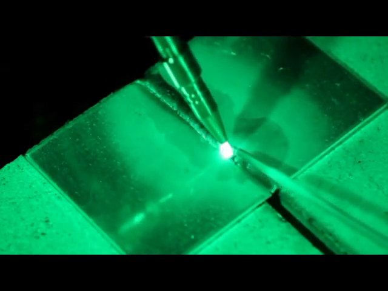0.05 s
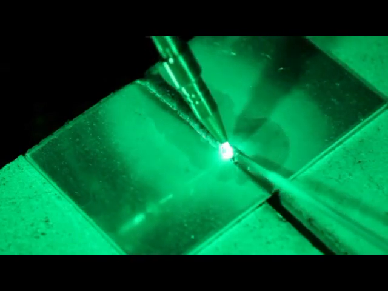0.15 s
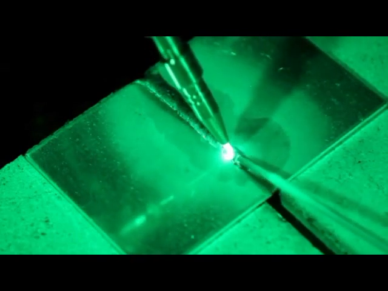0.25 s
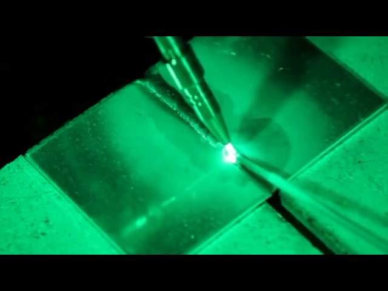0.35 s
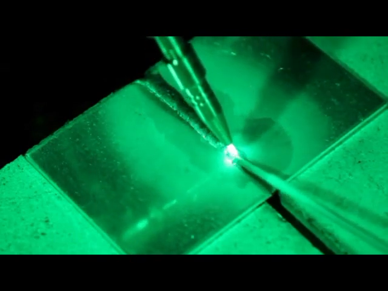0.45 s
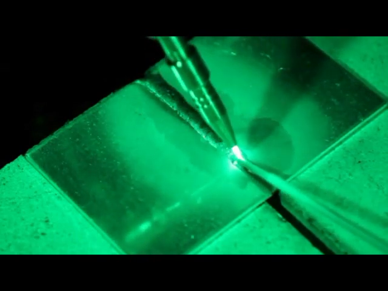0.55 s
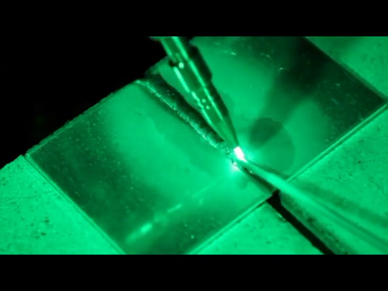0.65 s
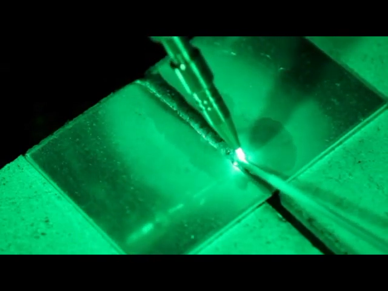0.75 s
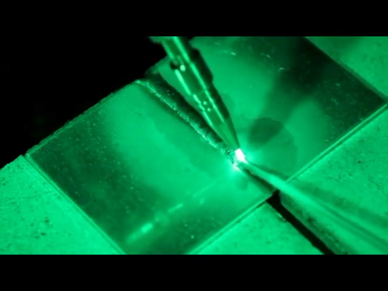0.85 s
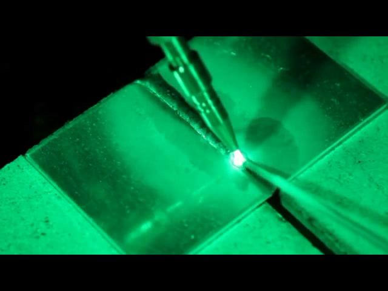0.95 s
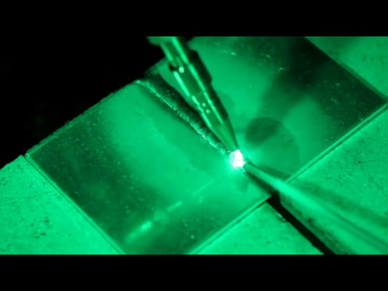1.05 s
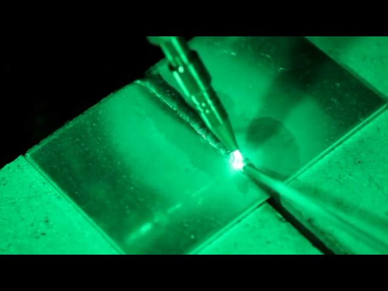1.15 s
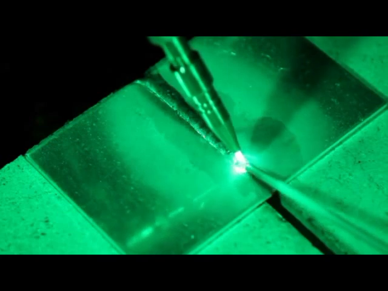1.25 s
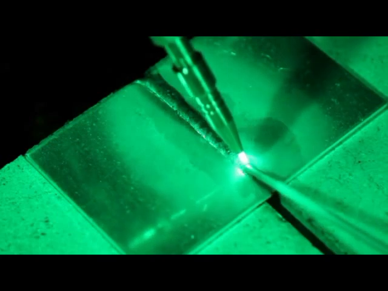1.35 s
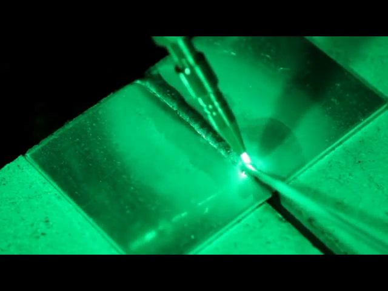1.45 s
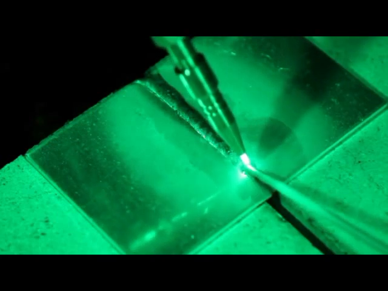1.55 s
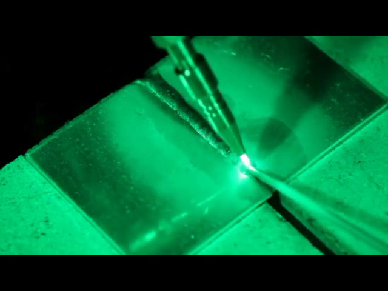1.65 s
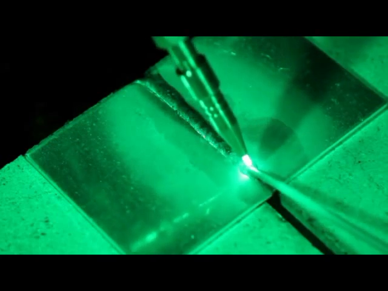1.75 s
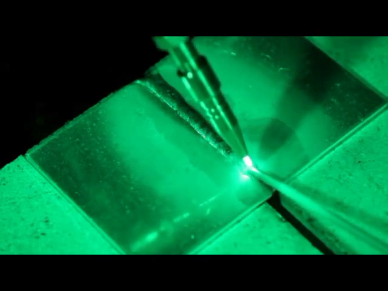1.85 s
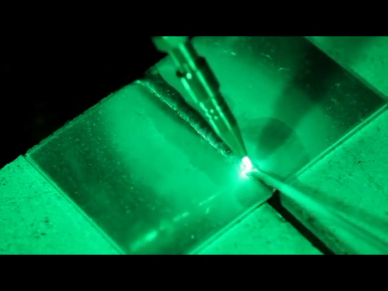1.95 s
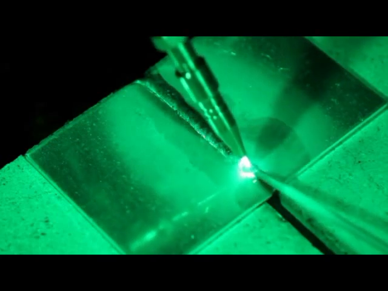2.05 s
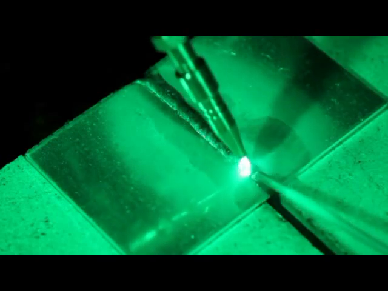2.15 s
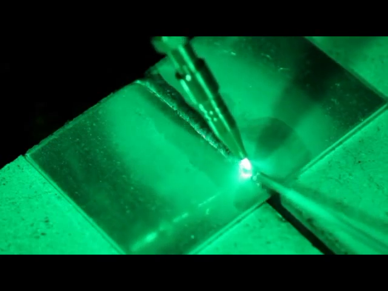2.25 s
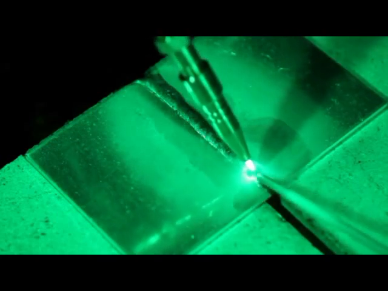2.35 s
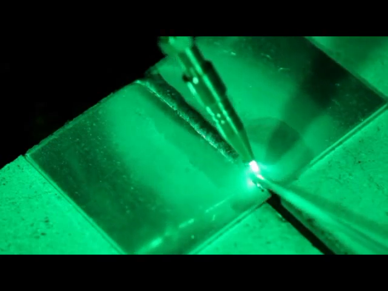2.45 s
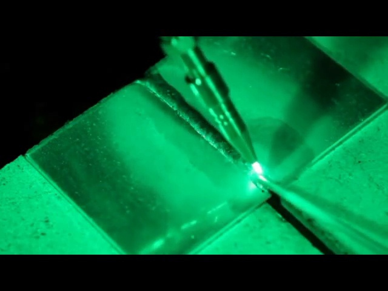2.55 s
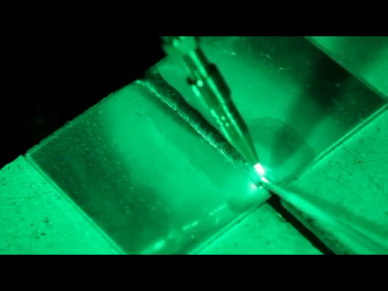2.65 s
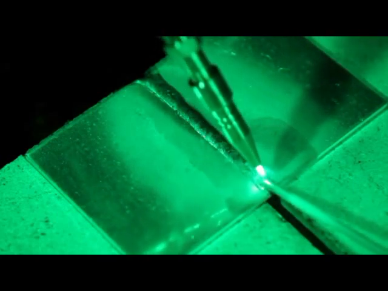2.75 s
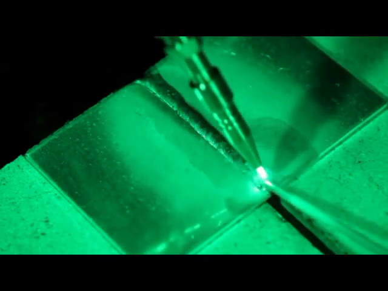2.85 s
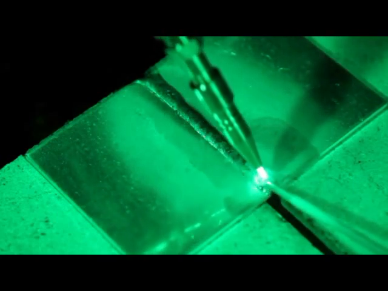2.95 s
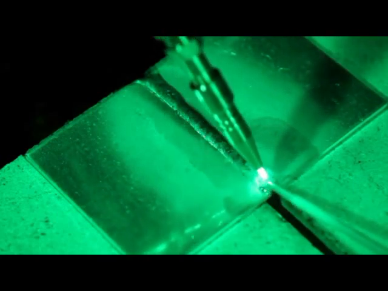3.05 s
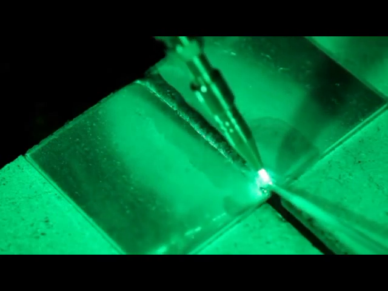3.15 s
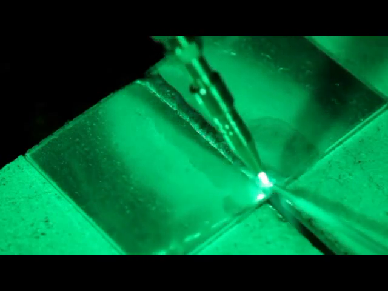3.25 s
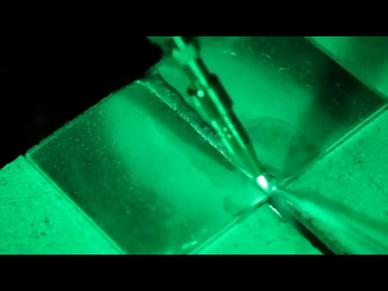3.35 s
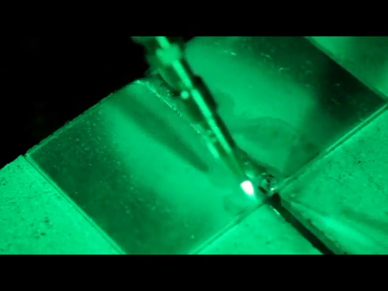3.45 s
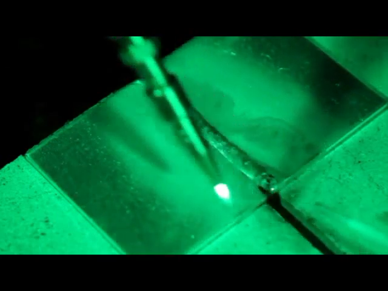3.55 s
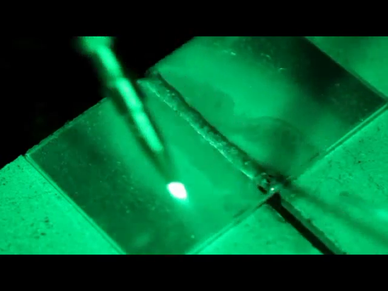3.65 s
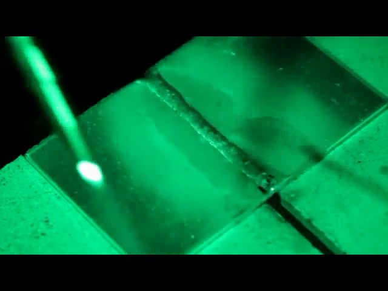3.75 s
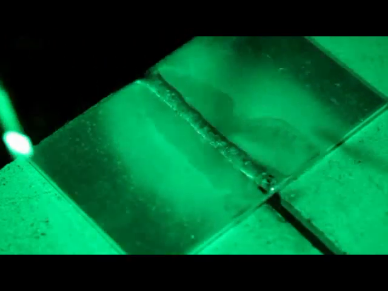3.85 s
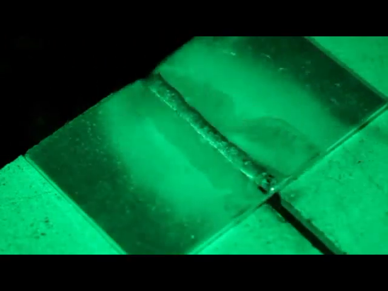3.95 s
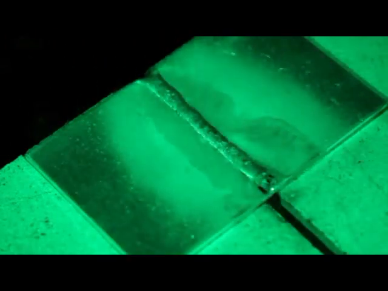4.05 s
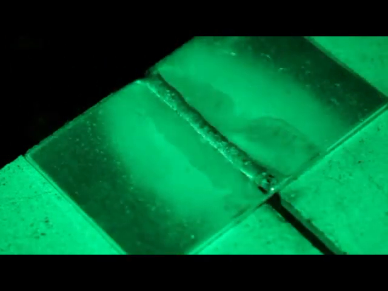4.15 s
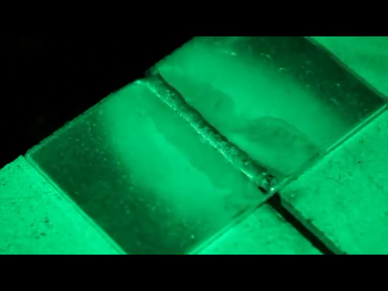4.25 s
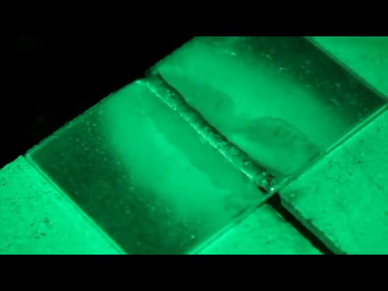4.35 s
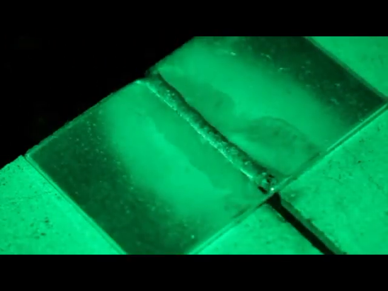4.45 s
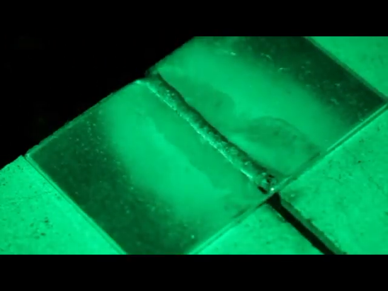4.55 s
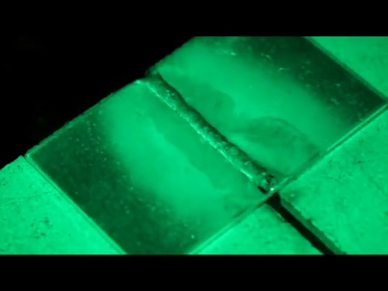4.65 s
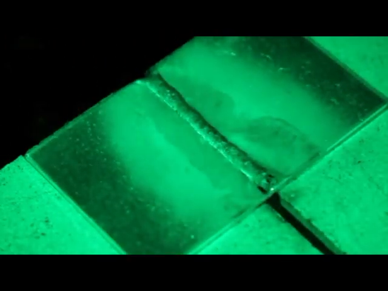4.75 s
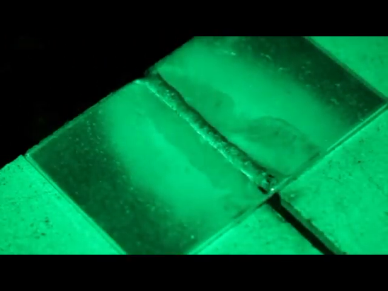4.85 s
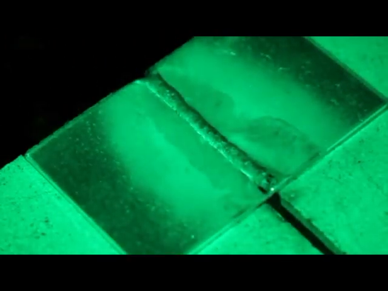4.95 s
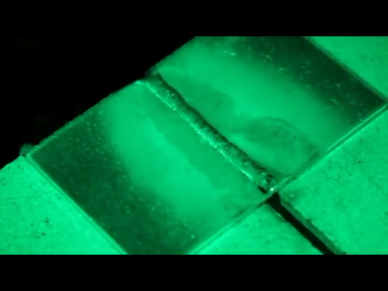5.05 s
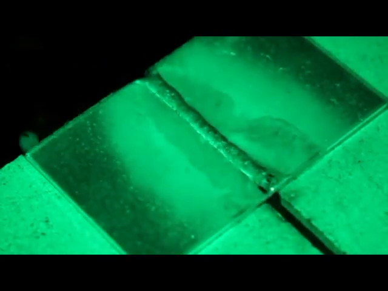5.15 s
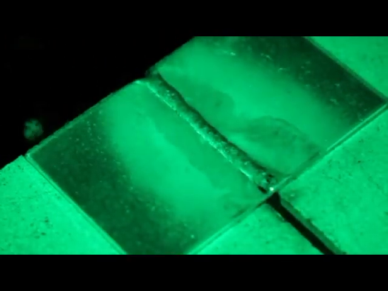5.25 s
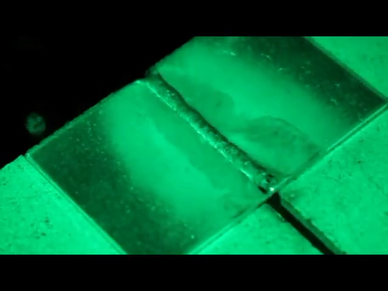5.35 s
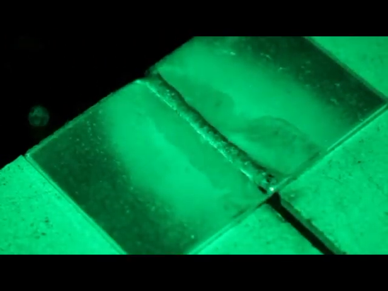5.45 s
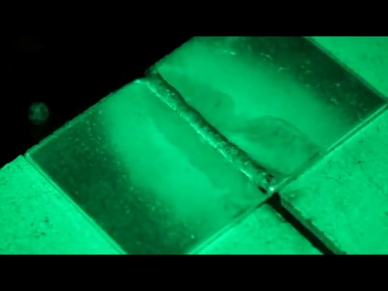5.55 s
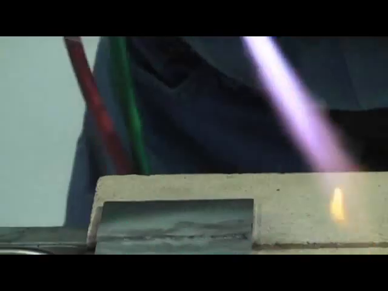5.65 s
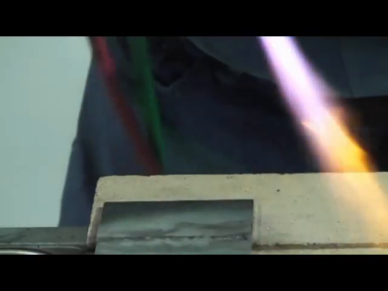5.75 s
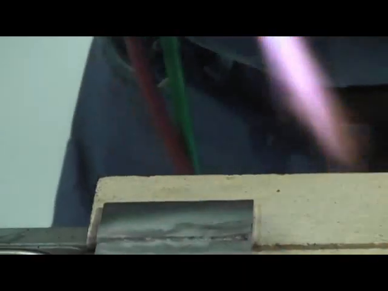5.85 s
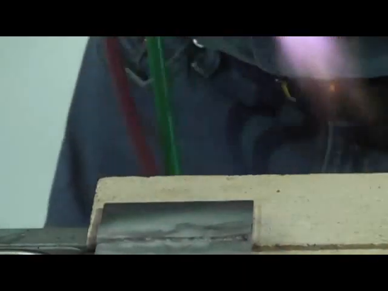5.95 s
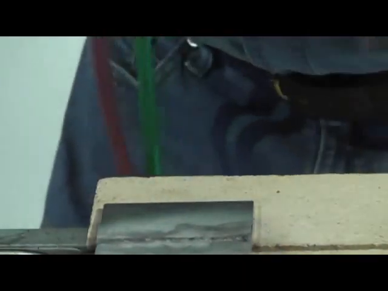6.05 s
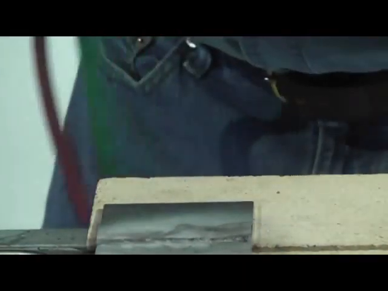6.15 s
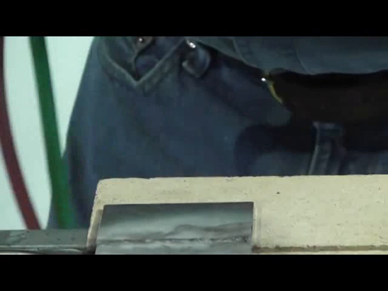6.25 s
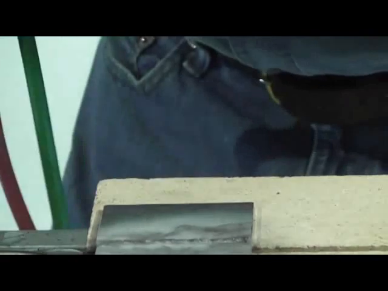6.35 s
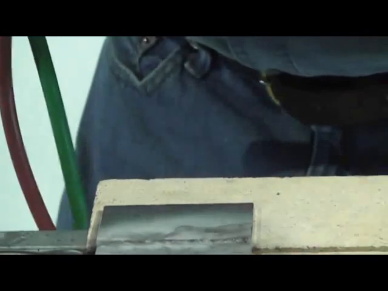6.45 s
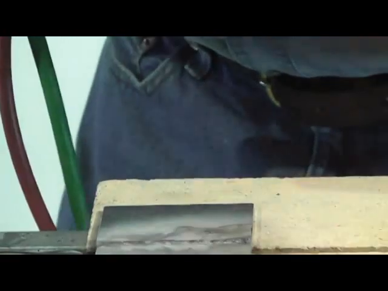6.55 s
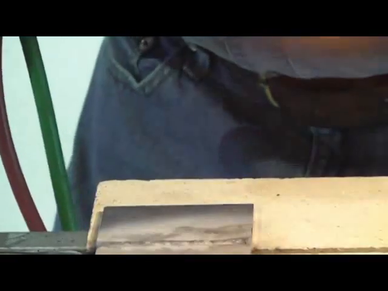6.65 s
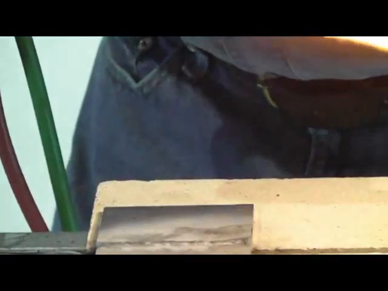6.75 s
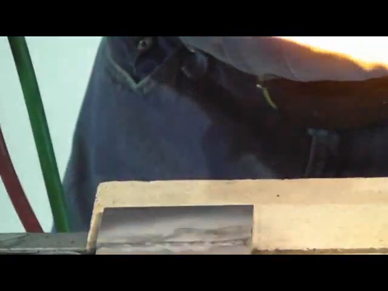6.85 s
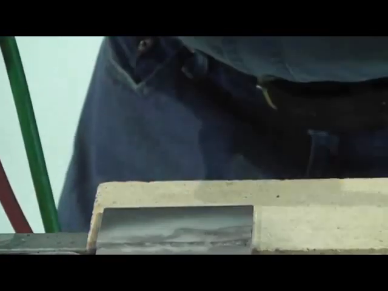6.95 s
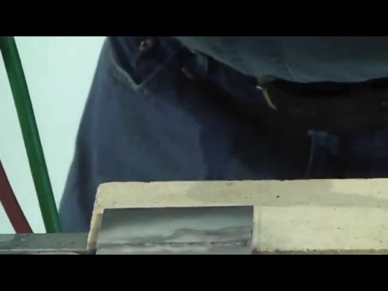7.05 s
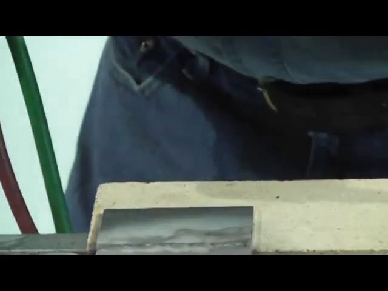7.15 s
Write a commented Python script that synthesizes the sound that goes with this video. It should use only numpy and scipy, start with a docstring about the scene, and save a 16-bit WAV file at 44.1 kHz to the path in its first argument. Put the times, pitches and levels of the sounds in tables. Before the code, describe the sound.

In a workshop, close up and the same in both channels, a gas torch burns with a low, faint roar and airy hiss. Sharp clicks of hot metal and tiny crackles come in irregular clusters, with a soft sinking burble midway. The flame then swells into a fluttering roar, small fittings clink lightly, and one very loud, distorted pop bursts out at the end, with a short room echo.

```python
"""A gas torch burns over a brick bench in a workshop, heard from close by, alike in both channels.
The flame is shaped noise: a roar combed by its echo off the bench, a rush of hot gas and the hiss of the jet.
It burbles once (a sinking tone in a puff of noise), then roars louder as the torch is lifted and swung.
Hot metal snaps and spatters in short clicks, and loose fittings ring as dying sines.
Near the end comes one overloading pop: a noise burst with the ring of the pipe, over the roar."""
import sys
import numpy as np
from scipy import signal
from scipy.fft import rfft, irfft
from scipy.io import wavfile
from scipy.ndimage import uniform_filter1d

SR = 44100
rng = np.random.default_rng(int(sys.argv[2]) if len(sys.argv) > 2 else 0)


def wrap_up_sound(samples):
    """Save the sound to the file named by the first command line argument, as 16-bit audio."""
    columns = np.atleast_2d(samples).T
    # keep every value between -1 and 1, then stretch to whole-number steps
    tamed = np.clip(columns, -1, 1)
    steps = np.round(tamed * 32767).astype(np.int16)
    wavfile.write(sys.argv[1], SR, steps)


N = 317255  # length in samples


def gain_of(db):
    """Turns decibels into a factor."""
    return 10 ** (np.asarray(db) / 20)


def evened(x):
    """Scales a sound to an rms of 1."""
    return x / np.sqrt(np.mean(x ** 2) + 1e-20)


def smooth_noise(count, size):
    """Slow random drift with an rms of 1, averaged over size values."""
    return evened(uniform_filter1d(rng.standard_normal(count), size=size))


def read(points, hz):
    """Reads a spectrum table on a log-frequency axis."""
    f, value = np.transpose(points)
    return np.interp(np.log(hz + 1), np.log(f + 1), value)


def along(table, t):
    """Reads the columns of a time curve at times t."""
    s, *columns = np.transpose(table)
    return [np.interp(t, s, column) for column in columns]


def add(mix, s, sound):
    """Mixes a sound in from time s."""
    part = mix[round(s * SR):][:len(sound)]
    part += sound[:len(part)]


def coloured(x, points):
    """Filters x by a spectrum table without delay."""
    hz = np.fft.rfftfreq(len(x), 1 / SR)
    return irfft(rfft(x) * gain_of(read(points, hz)), len(x))


def rung(modes, t):
    """Adds up dying sines, as struck metal rings."""
    return sum(gain_of(db - 60 * t / t60) * np.sin(2 * np.pi * hz * t) for hz, db, t60 in modes)


def swell(t, db, rise, fade_db_per_s):
    """Rises smoothly, then fades steadily in dB."""
    fade = gain_of(db - fade_db_per_s * np.maximum(t - rise, 0))
    return np.sin(np.pi / 2 * np.minimum(t / rise, 1)) ** 2 * fade


RUMBLE_DB, RUMBLE_PER_ROAR = -34.5, 0.59  # the deep rumble grows with the roar (dB, dB per dB)


def background():
    """A steady faint hiss with a thin fuzzy whine in it, and a little deep rumble."""
    hiss_colour = [(2000, -29.5), (3500, -3), (4200, -1), (4350, 1.5), (4500, -12), (10000, -5.5)]
    hiss = evened(coloured(rng.standard_normal(N), hiss_colour))
    rumble_colour = [(12, -12), (25, -4.9), (50, -14), (100, -28), (300, -70)]
    rumble = evened(coloured(rng.standard_normal(N), rumble_colour))
    roar_db = along(FLAME_LEVELS, np.arange(N) / SR)[0]
    return gain_of(-81) * hiss + gain_of(RUMBLE_DB + RUMBLE_PER_ROAR * roar_db) * rumble


# First echoes off the walls: t/s, relative level/dB
WALL_ECHOES = [(.0104, -22), (.0118, -13), (.0130, -19), (.0148, -15), (.0156, -18), (.0195, -20)]
# How long the room rings in each band: f/Hz, nominal time to fall 60 dB/s (scaled for two decays below)
ROOM_DECAY = [(200, 1), (700, 1), (1500, 0.58), (3000, 0.42), (6000, 0.23), (10000, 0.16)]


def workshop():
    """First wall echoes, then sparse taps of random sign, each band dying at its own speed."""
    taps = np.zeros(SR // 2)
    at = np.arange(0, len(taps) - 4, 4)
    taps[at + rng.integers(0, 4, len(at))] = rng.choice([-1., 1.], len(at))
    hz, t, z = signal.stft(taps, SR, nperseg=256)
    fall_db = -60 * t / read(ROOM_DECAY, hz)[:, None]
    decay = gain_of(1.45 * fall_db) + gain_of(-5.5 + 0.4 * fall_db)  # quick near the bench, slower from far walls
    tail = signal.istft(z * decay, SR, nperseg=256)[1]
    lag = np.arange(len(tail)) / SR
    tail *= gain_of(-17.5) * np.clip((lag - .002) / 0.0088, 0, 1)  # builds up as echoes gather
    for s, db in WALL_ECHOES:
        # rough walls smear each echo
        add(tail, s, gain_of(db - 60 * lag[:200] / 0.0037) * rng.standard_normal(200))
    return tail


# Faint pitched ticks before the burble: t/s, f/Hz, level/dB
FAINT_PIPS = [(2.65, 4420, -55), (2.678, 2330, -53), (2.711, 2600, -53)]


def pips():
    """A few milliseconds of a slightly falling tone for each faint tick."""
    out, t = np.zeros(N), np.arange(200) / SR
    for s, hz, db in FAINT_PIPS:
        tone = np.sin(2 * np.pi * hz * t * (1 - 8 * t))
        add(out, s, gain_of(db) * tone * np.hanning(len(t)))
    return out


# Spells of fine crackle: start t/s, end t/s, relative level/dB
CRACKLE_SPELLS = [(0.427, 0.482, -74), (0.695, 0.815, -51.5), (0.833, 0.886, -53), (1.924, 1.984, -56),
                  (2.35, 2.448, -63), (3.088, 3.152, -53.5), (4.11, 4.16, -58), (4.186, 4.32, -60)]


def sputter():
    """Many tiny clicks of uneven size while the metal spits."""
    t = np.arange(N) / SR
    active = np.zeros(N)
    for start, end, db in CRACKLE_SPELLS:
        ramps = np.minimum(4.5 * (t - start), (end - t) / 2) / 0.022  # quick rise, slower fall
        active += gain_of(db) * np.clip(ramps, 0, 1)
    hits = rng.random(N) < 900 / SR  # about 900 clicks per second
    clicks = hits * gain_of(2.6 * np.minimum(rng.exponential(1, N), 4)) * active
    grain = rng.standard_normal(200) * gain_of(-60 * t[:200] / 0.006)
    crackle = signal.oaconvolve(clicks, grain)[:N]
    return coloured(crackle, [(1200, -3), (3200, 0), (7000, -1.2), (11000, 10.0)])


# Knocks of small metal fittings: t/s, relative ring level/dB, relative tick level/dB
KNOCKS = [(5.236, -75, -52), (5.323, -78, -60), (5.381, -75, -48), (5.4932, -52, -44), (5.9768, -61, -35),
          (5.9885, -69, -42), (6.311, -85, -60)]
# Ringing tones of a fitting: f/Hz, relative level/dB, time to fall 60 dB/s
FITTING_TONES = [(3860, -5.5, .05), (4400, -17.5, 0.34), (5920, -3.5, 0.1), (7880, 0.5, 0.057),
                 (8300, -13.5, 0.24), (9270, -8.5, 0.14)]


def clink(ring_db, tick_db, noise):
    """A tick and the rattly ring of a small loose fitting."""
    t = np.arange(len(noise)) / SR
    tick = np.sinc(t * SR - 40) + noise * gain_of(-12.0 - 60 * t / 0.015)
    tick = coloured(tick, [(500, -20), (1400, 8.0), (3000, -1.5), (10000, 1.0)])
    rattle = .7 + .9 * evened(uniform_filter1d(noise, size=140))
    ring = rung(FITTING_TONES, t) * rattle * np.minimum(t / 0.0022, 1)
    return gain_of(ring_db) * ring + gain_of(tick_db + 5.5) * tick


# Full-bodied and strong snaps reach down to 0.6-2 kHz: base dB, dB per dB of body, dB per dB of strength
LOW_DB, LOW_PER_BODY, LOW_PER_PEAK = 5.5, 1.16, 0.51
# Snaps of hot metal: t/s, relative level/dB, body (2.5-6 kHz) level against the treble/dB
METAL_SNAPS = [(0.066, -17, -15.5), (0.103, -26.5, -27), (0.4326, -21.5, -28), (0.4737, -18.5, -23),
               (0.4835, -27, -32), (0.544, -25.5, -32), (0.5699, -16, -22.5), (0.67, -37, -13),
               (0.6893, -39, -18), (0.703, -22, -14), (0.707, -10, -19), (0.719, -23, -12),
               (0.7294, -10.5, -10), (0.7552, -29, -12), (0.7719, -33, -17), (0.782, -20.5, -16),
               (0.7916, -23, -12), (0.8365, -16.5, -9), (1.5882, -7.5, -10), (1.658, -15.5, -6),
               (1.794, -31, -22), (1.8041, -22.5, -21), (1.8649, -38, -16), (1.897, -17.5, -11),
               (1.9101, -4, -13), (1.9336, -10.5, -16), (1.954, -28, -17), (1.9777, -16.5, -18),
               (2.0163, -25.5, -14), (2.0559, -8, -19), (2.1803, -30.5, -14), (2.333, -31, -12),
               (2.3608, -12.5, -5), (2.392, -12.5, -10), (2.4447, -22.5, -18), (2.634, -40, -10),
               (2.7946, -35.5, -9), (3.0666, -14.5, -14.5), (3.102, -17, -16.5), (3.108, -25, -12),
               (3.112, -12, -16), (3.3733, -28, -18), (3.6185, -13, -22), (3.695, -1.5, -9.5),
               (3.8334, -42, -2), (4.029, -10, -12), (4.1129, -12.5, -13), (4.126, -17.5, -19),
               (4.1854, -13, -17), (4.1983, -13.5, -9), (4.244, -11.5, -6), (4.2478, -15.5, -8),
               (4.2706, -24.5, -16), (4.3065, -27.5, -12), (4.3512, -17.5, -6.5)]


def snap(db, middle_db, noise):
    """One sharp click, and apart from it the bounce off the plate and brief scatter among the bricks."""
    t = np.arange(len(noise)) / SR - .004  # the click falls at zero
    low_db = LOW_DB + LOW_PER_BODY * middle_db + LOW_PER_PEAK * db
    colour = [(350, low_db - 12.0), (750, low_db), (1700, low_db - 7.0),
              (2700, middle_db), (5000, middle_db + 0.5), (7200, 1.17), (11000, 1.0)]
    click = np.sinc(t * SR)
    bounce = gain_of(-12) * np.sinc((t - .0009) * SR)
    scatter = bounce + (t > 0) * gain_of(-21 - 60 * t / .014) * noise
    soft = gain_of(db + 5.5) * signal.windows.tukey(len(t), .3)
    return soft * coloured(click, colour), soft * coloured(scatter, colour)


POP_S = 6.9626
# Ring of the torch pipe as the flame snaps back: f/Hz, relative level/dB, time to fall 60 dB/s before choking
PIPE_RING = [(769, 1, 0.062), (1447, 0.5, 0.014), (1826, 6.5, 0.0057), (2660, -5.5, 0.024)]


def pop():
    """A burst of crackling pressure over about three swings of the pipe, quickly choked."""
    t = np.arange(4096) / SR - .01  # the pop starts at zero
    burst = rng.standard_normal(len(t)) * gain_of(2.5 - 60 * abs(t) / 0.017)
    burst = coloured(burst, [(1500, -12), (4500, -10), (6000, 7.0), (7500, -10), (9500, 3.6)])
    choked = np.exp(-abs(t / .0035) ** 4) + .13
    both = (t > 0) * (burst * np.minimum(choked, 1) + rung(PIPE_RING, abs(t)) * choked)
    return coloured(both, [(60, -3), (250, -0.5), (550, 3.0), (600, 0.0)])


# Spectrum of the pop's crack: f/Hz, relative level/dB
CRACK_COLOUR = [(88, -64), (150, -19), (356, -15.5), (388, -15), (432, -12), (772, -10), (921, -7.5),
                (1330, -5), (3110, -9), (3900, -7), (10100, -4.5), (13100, -36), (22000, -120)]


def crack():
    """The pop as the walls hear it: one hard front."""
    front = np.zeros(N)
    front[round(POP_S * SR)] = 1
    return coloured(front, CRACK_COLOUR)


BURBLE_S, BURBLE_LENGTH_S = 2.735, 0.27
GLIDE_FROM_HZ, GLIDE_TO_HZ, GLIDE_S = 380, 125, 0.06  # the pitch sinks quickly, then levels out
PUFF_DB, PUFF_RISE_S, PUFF_FADE_DB_PER_S = -56.5, 0.016, 45
TONE_DB, TONE_RISE_S, TONE_FADE_DB_PER_S, TONE_WOBBLE_DB = -48, .04, 380, 3.5


def burble():
    """A soft tone that slides down under a hollow puff of noise."""
    t = np.arange(0, BURBLE_LENGTH_S, 1 / SR)
    hz = GLIDE_TO_HZ + (GLIDE_FROM_HZ - GLIDE_TO_HZ) * np.exp(-t / GLIDE_S)
    wobble = gain_of(TONE_WOBBLE_DB * smooth_noise(len(t), 500))
    tone = np.sqrt(2) * wobble * np.sin(2 * np.pi * np.cumsum(hz) / SR)
    tone *= swell(t, TONE_DB, TONE_RISE_S, TONE_FADE_DB_PER_S)
    puff_colour = [(560, -22), (740, 1), (950, 1.0), (1120, -32), (1350, -12), (1700, -43)]
    puff = evened(coloured(rng.standard_normal(len(t)), puff_colour))
    puff *= swell(t, PUFF_DB, PUFF_RISE_S, PUFF_FADE_DB_PER_S)
    return (tone + puff) * signal.windows.tukey(len(t), .1)


# The swung flame flaps: typical pace, time to each flap's peak, level against the roar, spread in level
FLAPS_PER_S, FLAP_S, FLAP_DB, FLAP_SPREAD_DB = 24, .006, -6, 1.8


def flutter():
    """Short puffs of the roar in an uneven beat, fading in as the flame burns more strongly."""
    t = np.arange(N) / SR
    roar_db = along(FLAME_LEVELS, t)[0]
    strong = np.clip((roar_db + 60) / 4.1, 0, 1)
    pace = FLAPS_PER_S * gain_of(4.5 * smooth_noise(N, 2000))
    beats = np.diff(np.floor(np.cumsum(pace) / SR), prepend=0)  # one flap at each whole count
    flaps = beats * gain_of(FLAP_SPREAD_DB * rng.standard_normal(N))
    age = t[:4096] / FLAP_S
    shape = signal.oaconvolve(flaps, age * np.exp(1 - age))[:N]
    puff_colour = [(150, -31.5), (400, 4.0), (1200, 4.5), (1900, -4.5), (2600, -19), (4000, -33)]
    puff = evened(coloured(rng.standard_normal(N), puff_colour))
    return gain_of(roar_db + FLAP_DB) * strong * shape * puff


def turbulence(shape, patchy_db, flicker_db):
    """Random short-time spectra with drifting patches and a flicker shared by all bands."""
    bins, frames = shape.shape
    a, b, patches = rng.standard_normal((frames, bins, 3)).T
    patches = uniform_filter1d(patches, size=6, axis=0)
    patches = evened(uniform_filter1d(patches, size=16, axis=1))
    flicker = smooth_noise(frames, 5)
    z = shape * (a + 1j * b) * gain_of(patchy_db * patches + flicker_db * flicker)
    return evened(signal.istft(z, nperseg=512, noverlap=384)[1][:N])


FREE_FROM_DB, FREE_OVER_DB = -52.5, 4  # roar level where the flame starts to stand in free air, and the blend range
# Strength of the flame: t/s, roar level/dB, rush level/dB, gas jet hiss level/dB
FLAME_LEVELS = [(0.0, -64, -66, -64), (0.15, -58, -69.5, -73), (0.39, -65.5, -68.5, -68.5),
                (1.1, -64, -65.5, -74), (1.6, -64, -67.5, -69.5), (2.35, -63.5, -64.5, -64.5),
                (2.7, -62.5, -68.5, -79), (2.9, -62, -65.5, -71), (3.55, -61, -65.5, -64),
                (3.75, -62, -70.5, -74.5), (4.1, -64, -70.5, -69.5), (4.36, -60, -65.5, -68.5),
                (4.5, -56.5, -67, -70), (4.66, -61.5, -68.5, -70), (4.86, -55.5, -65.5, -84),
                (5.15, -51.5, -67.5, -87), (5.28, -46, -79.5, -80), (5.43, -46.5, -78, -77),
                (5.64, -50.5, -69.5, -79), (5.9, -51.5, -66, -82), (6.45, -50.5, -74.5, -81),
                (6.8, -49, -80.5, -83.5), (6.94, -52, -67, -85)]
# The bench echo's comb slides as the torch is swung away and back: t/s, second crest f/Hz
BENCH_CREST = [(0, 748), (5.45, 750), (5.85, 668), (5.95, 583), (6.55, 612), (6.8, 685)]
# Spectrum of turbulent burning: f/Hz, relative level/dB
ROAR_COLOUR = [(40, -21), (90, -16.5), (176, -1.5), (293, -1.5), (456, -3), (695, 0.07), (907, -6.5),
               (1510, -11.5), (2870, -35.5), (5000, -47.5), (8000, -80.5)]
# Spectrum of hot gas spreading over the work: f/Hz, relative level/dB
RUSH_COLOUR = [(530, -29), (900, 0.5), (1520, -2), (1980, -5.5), (2450, -3.5), (3060, -8), (3390, -21),
               (4410, -14.5), (6280, -18.5), (7090, -19.5), (10100, -16.5), (13100, -47), (22000, -120)]
# Spectrum of the same gas when the flame roars in free air: f/Hz, relative level/dB
FREE_RUSH_COLOUR = [(1180, -27), (2000, -8), (2260, -7.5), (2750, -12), (4240, -9), (7250, -17.5),
                    (10100, -19), (13100, -45), (22000, -120)]
# Spectrum of gas leaving the tip: f/Hz, relative level/dB
JET_COLOUR = [(4500, -47), (6200, -10.5), (7000, 4.5), (8200, -1.5), (10400, 0)]


def flame():
    """Roar combed by its echo off the bench, which shifts as the torch moves; rush of hot gas; thin jet hiss."""
    hz = np.fft.rfftfreq(512, 1 / SR)[:, None]
    frame_s = np.arange(N // 128 + 5) * 128 / SR
    delay = 2 / along(BENCH_CREST, frame_s)[0]
    comb = abs(1 + .5 * np.exp(-hz / 2500) * np.exp(2j * np.pi * hz * delay))
    roar = turbulence(gain_of(read(ROAR_COLOUR, hz)) * comb, patchy_db=1.4, flicker_db=1.5)

    free = np.clip((along(FLAME_LEVELS, frame_s)[0] - FREE_FROM_DB) / FREE_OVER_DB, 0, 1)
    over_work = evened(gain_of(read(RUSH_COLOUR, hz)))
    in_free_air = gain_of(-1.0) * evened(gain_of(read(FREE_RUSH_COLOUR, hz)))
    rush = turbulence((1 - free) * over_work + free * in_free_air, patchy_db=1.9, flicker_db=1.5)

    steady = np.ones(len(frame_s))
    jet = turbulence(gain_of(read(JET_COLOUR, hz)) * steady, patchy_db=.6, flicker_db=2.0)
    levels = gain_of(along(FLAME_LEVELS, np.arange(N) / SR))
    return (levels * [roar, rush, jet]).sum(axis=0)


def scene():
    """Mixes the near sounds, and adds the room's answer to the snaps and the pop."""
    clicks, near = np.zeros((2, N))
    for s, *levels in METAL_SNAPS:
        click, scatter = snap(*levels, rng.standard_normal(1024))
        add(clicks, s - .004, click)
        add(near, s - .004, scatter)
    for s, *levels in KNOCKS:
        add(near, s - .001, clink(*levels, rng.standard_normal(8192)))
    add(near, BURBLE_S, burble())
    add(near, POP_S - .01, pop())
    sent = gain_of(-30.0) * clicks + gain_of(15) * crack()
    room = signal.oaconvolve(sent, workshop())[:N]
    mono = background() + room + pips() + sputter() + clicks + near + flutter() + flame()
    return np.array([mono, mono])


EDGE_HZ = 10300  # top of the band


def record(dry):
    """The input stage clips the loudest peaks and passes little deep bass; then the band limit."""
    clipped = np.clip(dry, -.92, .92)
    thinned = signal.lfilter(*signal.butter(2, 90, "high", fs=SR), clipped)
    band_limit = signal.firwin(1023, EDGE_HZ, window=("kaiser", 9), fs=SR)
    return signal.oaconvolve(thinned, band_limit[None], "same")


dry = scene()
out = record(dry)
wrap_up_sound(out)
```